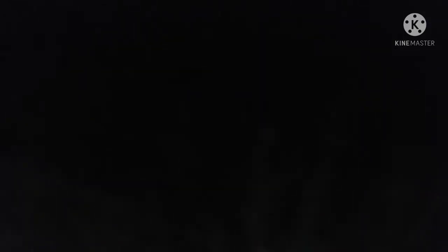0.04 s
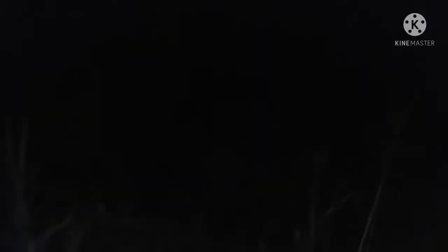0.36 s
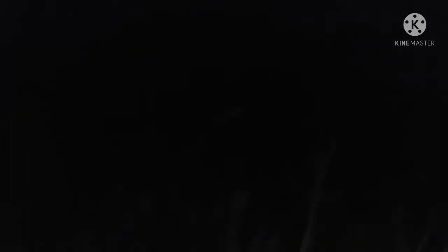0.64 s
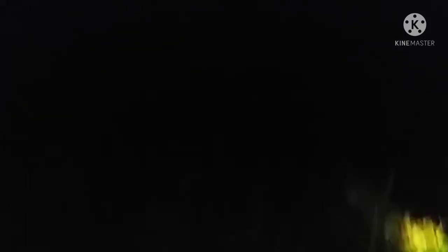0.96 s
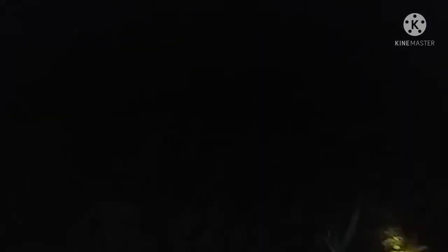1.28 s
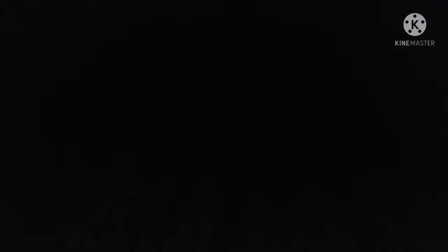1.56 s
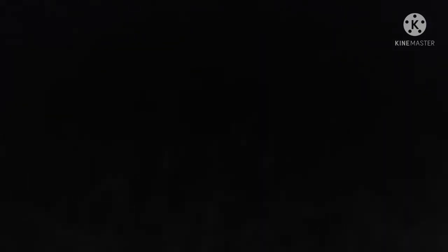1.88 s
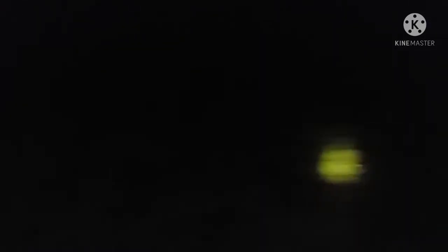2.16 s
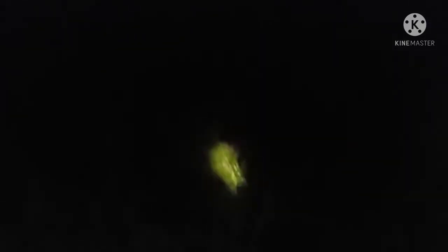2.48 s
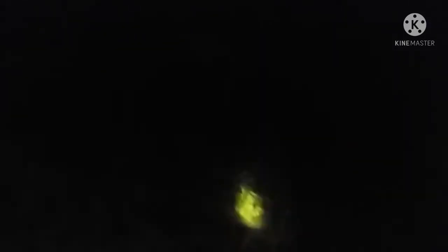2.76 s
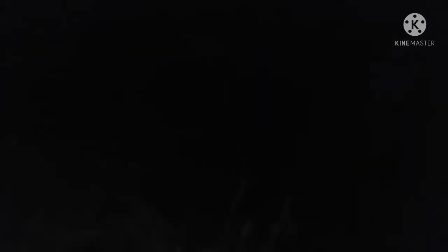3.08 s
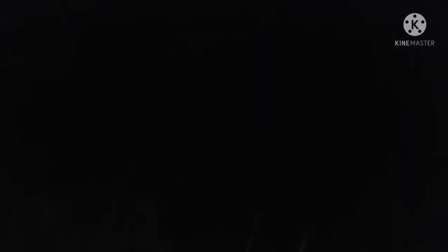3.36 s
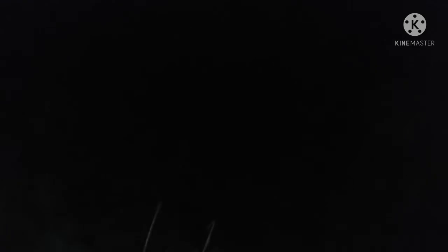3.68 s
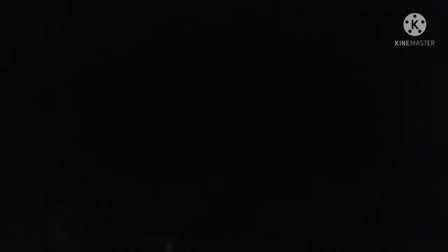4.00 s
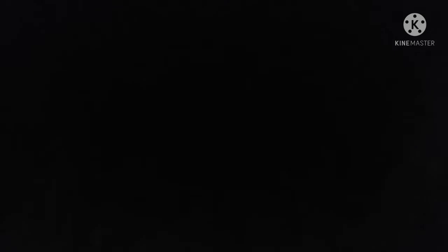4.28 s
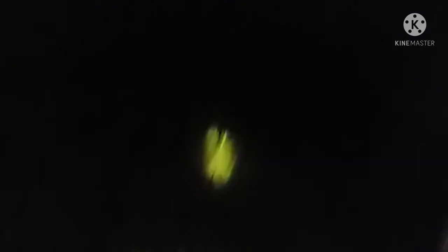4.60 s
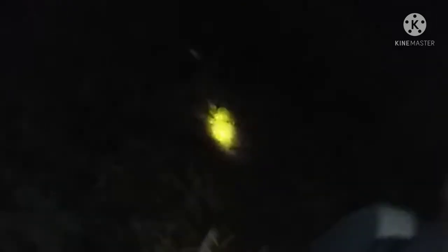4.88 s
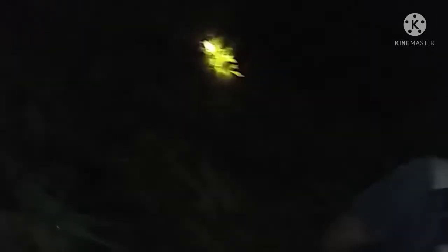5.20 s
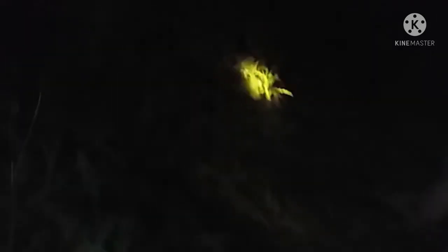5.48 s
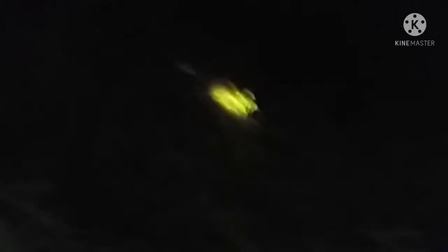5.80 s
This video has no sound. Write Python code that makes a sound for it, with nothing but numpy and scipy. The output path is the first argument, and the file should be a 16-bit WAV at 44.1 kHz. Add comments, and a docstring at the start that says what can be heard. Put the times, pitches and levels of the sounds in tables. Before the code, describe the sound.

Close, crunchy footsteps break through dry grass and leaves, twigs cracking and feet landing with soft thuds. After about a second the steps ease into uneven rustles and small ticks, then one more forceful push brings loud snaps before the lighter walking resumes. Behind it, the open night air holds a low rumble, a faint hiss and a thin, shrill chorus of distant insects.

```python
"""Someone pushes through dry scrub at night, over a low rumble, a faint hiss and far insects.
From the start, steps crush leaves and grass into a dense crackle, twigs snap out of it and
feet thud softly. After a second the pushes grow lighter; now and then a sole scuffs the soil
or a grass blade scrapes past. Near 4.8 seconds comes another hard push with loud snaps and
thuds, and lighter steps carry on to the end, at about six seconds."""
import sys
import numpy as np
from scipy import signal
from scipy.fft import rfft, irfft
from scipy.io import wavfile
from scipy.ndimage import uniform_filter1d

SR = 44100
rng = np.random.default_rng(int(sys.argv[2]) if len(sys.argv) > 2 else 0)


def output_pcm(signal):
    """Save a mono or channel-first signal as 16-bit PCM at the path in sys.argv[1].

    Samples are clipped to [-1, 1] before scaling.
    """
    pcm = np.clip(np.atleast_2d(signal).T, -1, 1) * 32767
    wavfile.write(sys.argv[1], SR, np.round(pcm).astype(np.int16))


N = 266760
TIME = np.arange(N) / SR


def gain(db):
    """Turn decibels (dB) into a number to multiply a sound by."""
    return 10 ** (np.asarray(db) / 20)


def rms(x):
    """The average strength of a sound (root mean square)."""
    return np.sqrt(np.mean(x ** 2) + 1e-18)


def band(x, low_hz, high_hz, order=3):
    """Keep the part of a sound between two frequencies."""
    return signal.sosfilt(signal.butter(order, [low_hz, high_hz], "band", fs=SR, output="sos"), x)


def tone_filter(points, size=2048):
    """Turn (Hz, dB) points into a filter's answer to one click, for use with through()."""
    hz, db = np.transpose(points)
    grid_hz = np.maximum(np.fft.rfftfreq(size, 1 / SR), 1)
    curve_db = np.interp(np.log(grid_hz), np.log(hz), db)
    cepstrum = irfft(np.log(gain(curve_db)))
    # folding onto the first half keeps the answer from starting before the click
    cepstrum[1:size // 2] *= 2
    cepstrum[size // 2 + 1:] = 0
    return irfft(np.exp(rfft(cepstrum)))


def through(x, answer):
    """Let every sample of x set off a copy of a short sound (convolution)."""
    return signal.fftconvolve(x, answer)[:len(x)]


def add(out, start_s, x):
    """Mix x into out at a given time."""
    start = int(start_s * SR)
    out[start:start + len(x)] += x[:max(N - start, 0)]


def ring(x, hz, q):
    """Make a sound ring at one pitch; a higher q rings longer."""
    return signal.lfilter(*signal.iirpeak(hz, q, fs=SR), x)


def rasp(hz, width_hz):
    """A rough, narrow band of noise that follows a moving pitch."""
    smoothing = signal.butter(2, width_hz / 2, fs=SR, output="sos")
    wobble = signal.sosfilt(smoothing, rng.standard_normal((2, len(hz))))
    phase = 2 * np.pi * np.cumsum(hz) / SR
    return (wobble[0] * np.cos(phase) + wobble[1] * np.sin(phase)) / rms(wobble)


def night(level_db=-55):
    """Low outdoor rumble and the microphone's own hiss."""
    # The tone of the steady background. Each row: frequency in Hz, relative level in dB.
    background_tone = [(25, -37), (45, 0), (75, 4.5), (120, 6.5), (220, -10), (500, -0.5), (1200, -1.5),
                       (2900, -7.5), (4300, -5.5), (7200, -2.5), (8200, -12), (10000, -18), (13000, -13),
                       (15500, -10)]
    noise = through(rng.standard_normal(N), tone_filter(background_tone, size=8192))
    return gain(level_db) * noise / rms(noise)


def insects(width_hz=360, octave_db=-4):
    """Many distant insects blur into one faint shrill band with an octave above it."""
    # How the chorus drifts. Each row: time in seconds, level in dB, pitch in Hz.
    chorus = [(0, -62, 3620), (1.6, -57.5, 3645), (2.6, -56, 3624), (3.2, -58.5, 3700),
              (3.901, -50.5, 3610), (4.4, -56.5, 3780), (5.302, -53.5, 3760), (6.05, -59, 3660)]
    times, levels, pitches = np.transpose(chorus)
    db = np.interp(TIME, times, levels)
    hz = np.interp(TIME, times, pitches)
    return gain(db) * (rasp(hz, width_hz) + gain(octave_db) * rasp(2 * hz, 2 * width_hz))


def pressure(trailing_db=-53.5, trailing_stalk_db=-66, fall_shape=1.1):
    """Each push swells and dies away. Gives the leaf and stalk levels over time, in dB."""
    # A leg or arm presses into the brush. Each row: time of hardest press in seconds, leaf level
    # in dB, rise in seconds, fall in seconds, stalk level in dB compared with the leaves.
    pushes = [(.019, -31, 0.068, 0.16, -5.5), (.158, -27.5, 0.046, .042, -5),
              (.519, -32, 0.024, 0.018, -2.5), (.562, -33, 0.0083, 0.041, 3.5),
              (0.646, -31, 0.0058, 0.025, -0.5), (.728, -32, 0.03, 0.15, -1), (0.839, -33, 0.012, .1, -2.5),
              (1.02, -42, 0.0066, 0.082, -6), (1.253, -46, .005, 0.035, -4.5),
              (1.389, -49.5, 0.041, 0.031, 1.5), (1.569, -29, 0.013, 0.017, -7),
              (1.695, -53, 0.18, 0.062, 3), (1.836, -52, 0.055, 0.024, 3.5), (1.976, -37, 0.027, 0.22, -10),
              (2.056, -30, 0.0045, 0.02, -16), (2.172, -40.5, 0.035, 0.049, -9.5),
              (2.53, -38, 0.0058, 0.018, -3), (2.785, -41, 0.22, .067, -12), (2.884, -40.5, 0.082, .2, -11),
              (3.005, -34.5, 0.019, 0.053, -11), (3.237, -40.5, 0.042, 0.096, -7.5),
              (3.39, -40.5, 0.11, 0.076, -16), (3.504, -41.5, 0.019, .07, -15),
              (3.595, -39, 0.0077, 0.057, -10.5), (3.692, -42.5, 0.028, 0.28, -9),
              (3.91, -37.5, 0.052, 0.066, -5), (4.017, -39, .012, 0.2, -7.5),
              (4.407, -34, 0.0084, 0.125, -11.5), (4.712, -31.5, 0.016, 0.095, -9),
              (4.775, -26, 0.01, 0.098, -10.5), (4.97, -38.5, 0.06, 0.18, -8),
              (5.19, -44.5, .06, 0.088, -19), (5.424, -43.5, 0.066, .05, -4.5),
              (5.62, -36, 0.1, 0.064, -8.5), (5.784, -45.5, 0.027, 0.076, -3),
              (5.86, -42.5, 0.054, 0.15, -13)]
    # between pushes, plants still trail along the legs
    leaf_power, stalk_power = gain(trailing_db) ** 2, gain(trailing_stalk_db) ** 2
    for peak_s, db, rise_s, fall_s, stalk_db in pushes:
        from_peak = np.maximum((peak_s - TIME) / rise_s, (TIME - peak_s) / fall_s)
        swell = np.exp(-np.minimum(from_peak, 10) ** fall_shape)
        power = (gain(db) * swell) ** 2
        leaf_power += power
        stalk_power += power * gain(stalk_db) ** 2
    return 10 * np.log10(leaf_power), 10 * np.log10(stalk_power)


def fracture(length_ms, click, scatter_db, scatter_ms, size=2048):
    """Fibres give way in a burst that dies at once; nearby stems scatter a faint tail."""
    ms = 1000 * np.arange(size) / SR
    fade = np.exp(-ms / length_ms) + gain(scatter_db) * np.exp(-ms / scatter_ms)
    burst = rng.standard_normal(size) * fade
    burst[0] = click * rng.choice([-1, 1])
    return burst


def crackle(breaks_per_s, spread_db=4.5, grain_ms=0.75, ring_db=6, pitches=14):
    """Countless tiny breaks of very unequal size, on leaves that each ring at their own pitch."""
    out = np.zeros(N)
    for hz in np.geomspace(450, 7500, pitches):
        breaks = rng.random(N) < breaks_per_s / pitches / SR
        sizes = gain(spread_db * np.minimum(rng.exponential(size=N), 3.8))
        signs = rng.choice([-1, 1], N)
        length_ms = grain_ms * np.exp(0.45 * rng.standard_normal())
        leaf = fracture(length_ms, click=3.4, scatter_db=-10.5, scatter_ms=6)
        leaf += gain(ring_db) * ring(leaf, hz, q=4)
        out += through(breaks * sizes * signs, leaf / rms(leaf))
    return out


def even(x, span_s=0.035):
    """Even out the loudness but keep the fine crackle."""
    size = int(span_s * SR)
    power = uniform_filter1d(uniform_filter1d(x ** 2, size), size)
    return x / np.sqrt(power + 1e-12)


def rustle(colour, leaf_db, stalk_db):
    """Pressing harder breaks more leaves a second; stalks crunch lower, and ground litter lowest."""
    breaks_per_s = 1200 * gain(0.35 * (leaf_db + 42.5))
    grains = even(crackle(breaks_per_s))
    sliding = gain(-6.5) * rng.standard_normal(N)  # blades brushing past each other
    sound = through(grains + sliding, colour)
    leaves = gain(leaf_db) * even(band(sound, 2960, 15000))
    stalks = gain(stalk_db) * even(band(sound, 604, 2250))
    litter = gain(stalk_db - 6) * even(band(sound, 97, 569))
    # the lightest touches mostly bend the plants, so they are quieter still
    softening = 1 / np.sqrt(1 + gain(2 * (-57 - leaf_db)))
    return softening * (leaves + stalks + litter)


def snap(colour, body_db, length_ms, ring_hz, ring_db=11, onset_samples=240):
    """A twig breaks and rings briefly: thick ones low and woody, thin ones with a high tick."""
    burst = fracture(length_ms, click=3, scatter_db=-21, scatter_ms=5)
    burst = through(burst, colour)
    burst += gain(ring_db) * ring(burst, ring_hz, q=4.1 * (ring_hz / 2000) ** 0.25)
    crack_db = 3 + 0.62 * body_db
    sparkle_db = -13 + 0.18 * max(-15 - body_db, 0)  # the thinnest twigs sparkle more
    # Body, crack, tick and sparkle. Each row: low and high edge in Hz, dB compared with the tick.
    parts = [(178, 1040, body_db), (1263, 3620, crack_db), (3950, 10200, 0), (10340, 15500, sparkle_db)]
    sound = 0
    for low_hz, high_hz, part_db in parts:
        part = band(burst, low_hz, high_hz, order=4)
        sound += gain(part_db) * part / rms(part[:onset_samples])
    return sound / rms(sound[:onset_samples])


def loud_snaps(colour):
    """The breaking twigs and stalks that stand out of the rustle."""
    # Each row: start in seconds, level in dB, woody body in dB compared with the high tick,
    # fade time of the break in milliseconds, ringing pitch in Hz.
    breaks = [(.012, -16, -8, 0.47, 1450), (0.025, -31, -11, 2, 1200), (0.034, -24.5, -15, 4, 8700),
              (0.0452, -22.5, -4, 1.7, 1660), (0.072, -30, -11, .5, 7100), (0.1183, -26.5, 0, 0.37, 2800),
              (.133, -24, -7, .9, 7600), (0.1538, -13, -14, 0.25, 7900), (0.1595, -29, -5, 1.8, 7100),
              (.168, -23, -26, 1.7, 6700), (0.1823, -25, 4, 0.93, 700), (0.423, -32, -15, 2.2, 5800),
              (0.4794, -32, 5, 3.1, 670), (0.4926, -24.5, -25, 0.63, 6700), (0.515, -27, 0, 2.9, 1200),
              (0.5573, -21.5, 15, 1.1, 780), (0.567, -27.5, 15, 1.5, 1210), (.619, -32.5, 17, 1.3, 700),
              (0.6409, -26.5, -6, 1.1, 1570), (.647, -26.5, 6, 2.2, 1490), (0.664, -25, -3, 2, 1290),
              (0.6861, -26.5, 1, .7, 1390), (0.7093, -20, 6, 2.1, 485), (0.7316, -19, 4.5, 0.48, 1270),
              (0.7533, -27, 6, 1.5, 1900), (0.7705, -23, -1, 2.6, 2040), (0.8375, -23.5, 9, 6.1, 487),
              (.949, -33.5, -4, 1.5, 2000), (1.0206, -26, 3, 0.88, 820), (1.0657, -36.5, -26, .3, 6660),
              (1.2512, -40, -6, 1, 3170), (1.5399, -35, -11.5, 1.6, 2930), (1.5533, -24.5, -20, 1.6, 6500),
              (1.9504, -20.5, -36, 0.79, 7240), (2.0014, -30.5, -21, 1.1, 7000),
              (2.033, -22, -22, 0.93, 7500), (2.0495, -21.5, -11, 3.2, 2710),
              (2.0653, -30, -32, 0.33, 6600), (2.1532, -35, -12, 0.92, 6200),
              (2.1897, -31.5, -16, 0.46, 6600), (2.2484, -32, -39.5, 0.49, 7800),
              (2.287, -34.5, -15, 1.3, 7700), (2.6384, -36, -14.5, 2.2, 7300),
              (2.6815, -38.5, -5, 2.3, 5360), (2.7587, -24.5, -26, 2, 6900), (2.7893, -31, -27, 1.5, 7850),
              (2.807, -31, -10, 0.45, 2280), (2.8302, -23, -36, 0.74, 6300), (2.9834, -32, -35, 1, 6600),
              (2.998, -24, -7.5, 1.5, 7800), (3.0136, -21.5, -18, 0.9, 7400),
              (3.1065, -37, -6.5, 0.33, 3400), (3.2276, -23.5, -11.5, 1.6, 7240),
              (3.2397, -28, -15.5, 0.53, 5700), (3.3266, -35, -11, 3.5, 7400), (3.351, -33, -28, 3.4, 7300),
              (3.3875, -29.5, -17, 3.5, 4530), (3.524, -37, -18, .8, 5600), (3.6821, -36.5, -11, .8, 3100),
              (3.7012, -32.5, -15, 5.8, 5940), (3.7843, -30.5, -12.5, 0.27, 7600),
              (3.8269, -34.5, -13, .8, 3850), (3.8866, -27, -1, 2.5, 6900), (3.9051, -27, -12, 1.2, 3600),
              (4.019, -28, -6, .6, 4580), (4.0254, -29.5, -16, 1.1, 6100), (4.0768, -34, -13, 2.3, 494),
              (4.1186, -32.5, -34, .6, 4540), (4.3972, -17, -36, 1.1, 7700),
              (4.4024, -27.5, -34, .77, 7360), (4.449, -38, 11, 1.1, 596), (4.469, -21.5, -26, 0.62, 6900),
              (4.5168, -26, -25.5, 1.6, 6500), (4.5255, -29.5, -14, 1.3, 2470),
              (4.6812, -25.5, -20, 1.4, 4100), (4.6908, -24.5, -9, 1.6, 3420),
              (4.7134, -26.5, -11, 0.9, 3260), (4.732, -25.5, -10, 3.4, 6500),
              (4.7456, -22.5, -21, 0.9, 3870), (4.7693, -20, 3, 1.3, 1070), (4.773, -16, -11, 0.77, 7000),
              (4.7874, -17, -22, 3.2, 3840), (4.854, -26.5, -11, 3.7, 6460),
              (4.8652, -27.5, -7, 0.96, 3270), (4.881, -30, -10, 1, 5890), (4.9555, -30.5, -21, 0.79, 5100),
              (5.003, -32, -7, 1, 2760), (5.0795, -26, -23, 3.7, 7700), (5.134, -31.5, -19, 5.2, 5360),
              (5.372, -34.5, -8, 2.7, 1740), (5.4191, -21.5, -8.5, 0.79, 5600),
              (5.445, -32, -12, 0.26, 6600), (5.4823, -34, -11, .3, 6700), (5.5661, -25, -6.5, 2.7, 4460),
              (5.6141, -27.5, -7, 1, 2500), (5.6659, -32.5, -3.5, .5, 3556), (5.819, -30.5, -8, 4.4, 7000),
              (5.8381, -33.5, -26, 3.6, 3420), (5.8768, -34, -8.5, 2.3, 1490)]
    out = np.zeros(N)
    for start_s, db, body_db, length_ms, ring_hz in breaks:
        add(out, start_s, gain(db) * snap(colour, body_db, length_ms, ring_hz))
    return out


def small_twigs(colour, leaf_db, stalk_db, tries_per_s=14, breaking_db=-47, count=200):
    """Twigs break by chance under a firm push: louder if it is harder, woodier among more stalks."""
    out = np.zeros(N)
    try_chance = tries_per_s * N / SR / count
    draws, variations = rng.random((count, 3)), rng.standard_normal((count, 2))
    for (when, luck, pitch), (strength, wood) in zip(draws, variations):
        i = int(when * N)
        if luck < try_chance and leaf_db[i] > breaking_db:
            db = -40.5 + 0.46 * (leaf_db[i] - breaking_db) + 2.5 * strength
            body_db = -5 + stalk_db[i] - leaf_db[i] + 6 * wood
            twig = snap(colour, body_db, length_ms=1, ring_hz=2500 + 5300 * pitch)
            add(out, TIME[i], gain(db) * twig)
    return out


def thuds(rise_cycles=0.97, sag=0.15, grit=0.69, settle_s=0.019, trim_db=-2, size=4096):
    """A soft landing pushes the ground for a cycle or two, sinking in pitch; then the soil settles."""
    # Feet and legs landing. Each row: start in seconds, level in dB before the trim, pitch in Hz.
    landings = [(0.149, -34, 208), (0.559, -29.5, 336), (0.707, -23, 356), (0.836, -28, 397),
                (1.251, -36, 202), (1.364, -41.5, 274), (1.693, -39.5, 156), (2.134, -45, 261),
                (4.068, -33, 360), (4.178, -40.5, 179), (4.751, -25, 257), (4.771, -31.5, 140),
                (4.888, -33.5, 394), (4.952, -41, 91.5), (5.402, -40.5, 123), (5.594, -44, 403)]
    out, t = np.zeros(N), np.arange(size) / SR
    for start_s, db, hz in landings:
        sinking_hz = hz * (1 + sag * (2 * np.exp(-t / 0.013) - 1))
        phase = 2 * np.pi * np.cumsum(sinking_hz) / SR
        age = t * hz / rise_cycles  # 1 at the top of the swell
        thump = age ** 2 * np.exp(2 * (1 - age)) * np.sin(phase)
        soil = band(rng.standard_normal(size), 0.52 * hz, 1.53 * hz, order=2)
        settling = (1 - np.exp(-age)) * np.exp(-t / settle_s) * soil / rms(soil)
        add(out, start_s, gain(db + trim_db) * (thump + grit * settling))
    return out


def scuffs():
    """Loose soil grinds under a sliding sole: a short, dull, gritty swell."""
    # Each row: start in seconds, length in seconds, middle frequency in Hz, level in dB.
    slides = [(1.338, 0.037, 800, -56), (1.658, 0.076, 810, -48), (2.645, 0.095, 1090, -47.5),
              (3.282, 0.06, 900, -45.5), (4.055, 0.036, 450, -40), (4.121, 0.078, 960, -50),
              (4.325, 0.022, 447, -49), (5.099, 0.067, 636, -48)]
    out = np.zeros(N)
    for start_s, length_s, hz, db in slides:
        size = int(length_s * SR)
        spiky_noise = rng.standard_normal(size) ** 3
        grit = band(spiky_noise, 0.73 * hz, 1.27 * hz, order=2)
        add(out, start_s, gain(db) * np.hanning(size) * grit / rms(grit))
    return out


def grass_scrapes(width_hz=420):
    """A ribbed blade sliding past sings at the rate its ribs go by, so the pitch follows the speed."""
    # Each row: start in seconds, length in seconds, first and last pitch in Hz, level in dB.
    blades = [(2.35, 0.21, 6300, 6400, -66), (2.511, 0.042, 2830, 2070, -49),
              (3.687, 0.036, 5600, 6000, -36.5), (5.89, 0.089, 4100, 4530, -49),
              (5.937, 0.12, 5150, 4900, -55)]
    out = np.zeros(N)
    for start_s, length_s, first_hz, last_hz, db in blades:
        size = int(length_s * SR)
        glide = rasp(np.linspace(first_hz, last_hz, size), width_hz)
        add(out, start_s, gain(db) * np.sqrt(np.hanning(size)) * glide)
    return out


def scene():
    """Brush and feet close by, in the open night air."""
    # Dry leaves and wood heard through a phone's small microphone opening.
    # Each row: frequency in Hz, boost or cut in dB.
    dry_tone = [(60, -6), (150, -6), (400, -2.5), (1400, 1), (2600, 0), (3700, 0), (5000, 0), (6300, 2),
                (7700, 3.5), (8600, -4.5), (10200, -18), (12400, -8), (15500, -10)]
    colour = tone_filter(dry_tone)
    leaf_db, stalk_db = pressure()
    brush = rustle(colour, leaf_db, stalk_db) + loud_snaps(colour)
    brush += small_twigs(colour, leaf_db, stalk_db) + grass_scrapes()
    feet = thuds() + scuffs()
    return (brush + feet + insects() + night())[None]


def record(dry, top_hz=15600):
    """The phone rounds the sharpest peaks and cuts the highest treble."""
    rounded = np.tanh(0.98 * dry) / 0.93
    return signal.sosfilt(signal.ellip(8, 0.2, 70, top_hz, fs=SR, output="sos"), rounded)


dry = scene()
out = record(dry)
output_pcm(out)
```